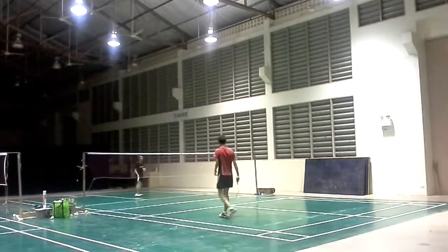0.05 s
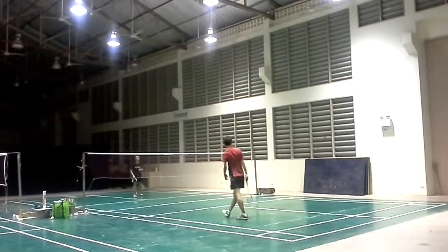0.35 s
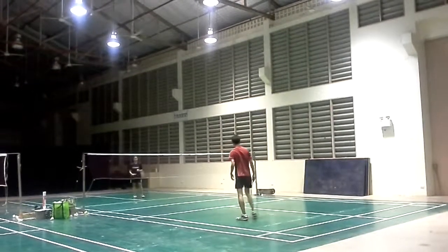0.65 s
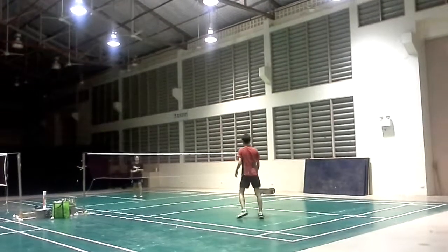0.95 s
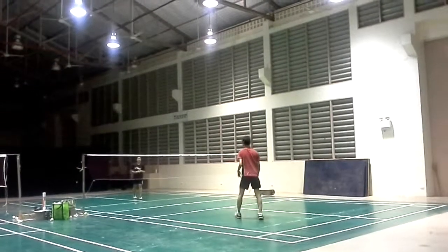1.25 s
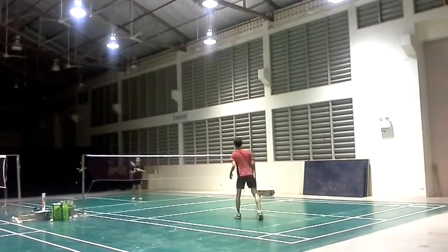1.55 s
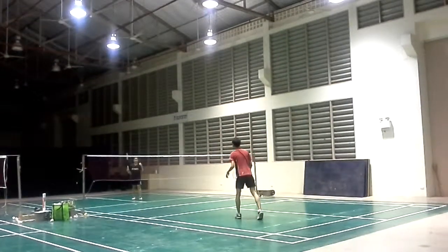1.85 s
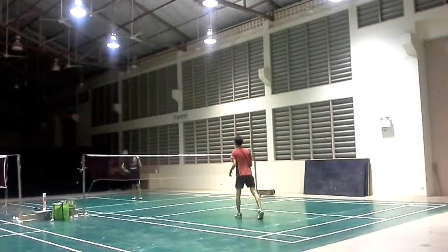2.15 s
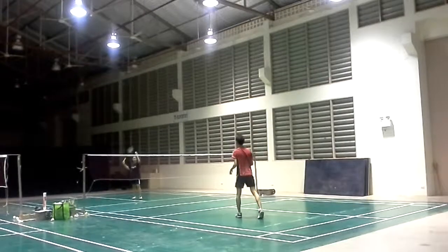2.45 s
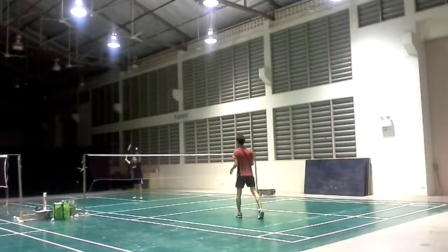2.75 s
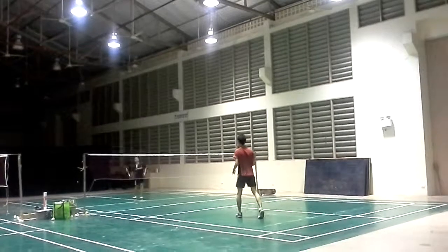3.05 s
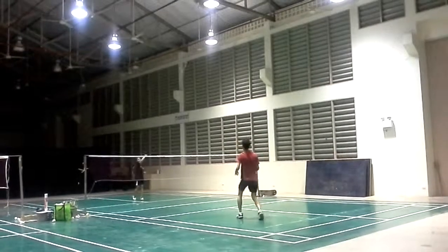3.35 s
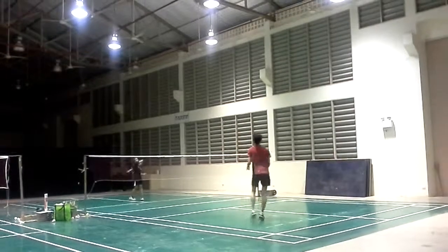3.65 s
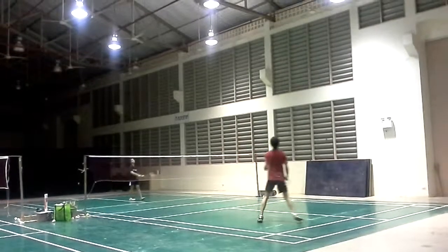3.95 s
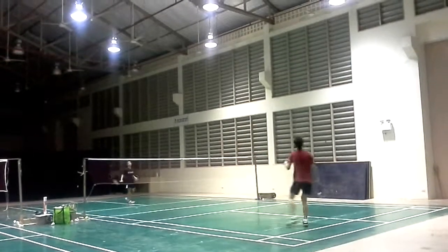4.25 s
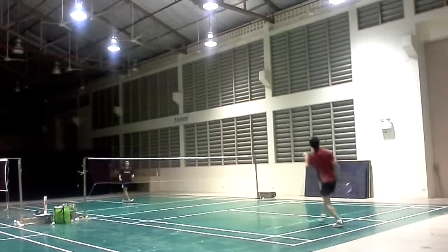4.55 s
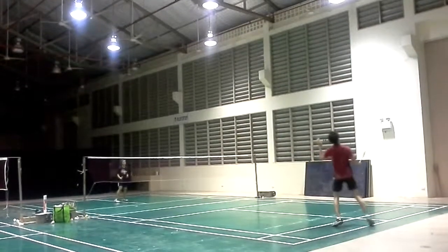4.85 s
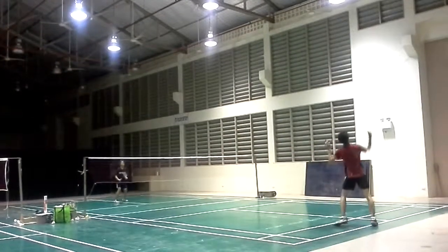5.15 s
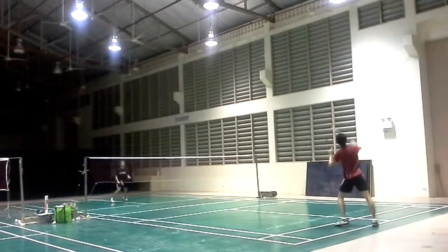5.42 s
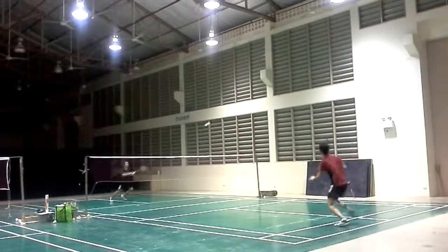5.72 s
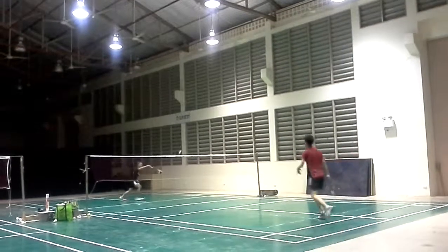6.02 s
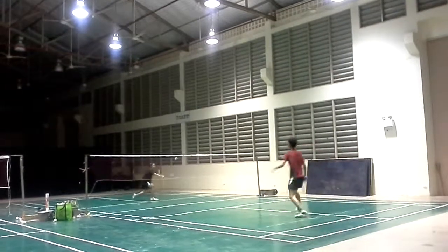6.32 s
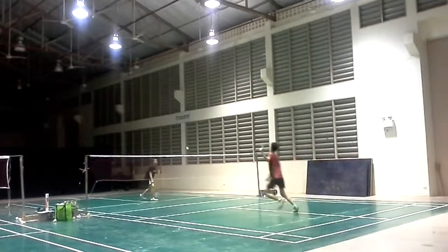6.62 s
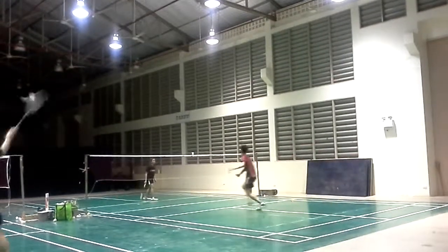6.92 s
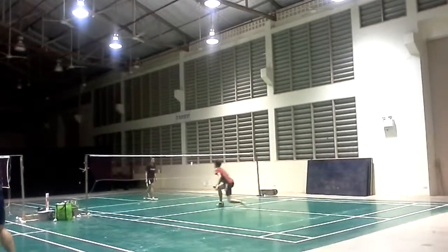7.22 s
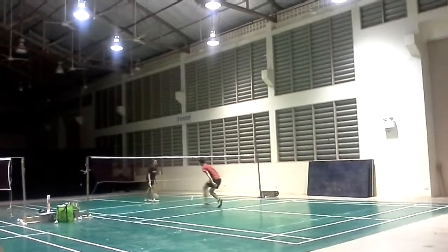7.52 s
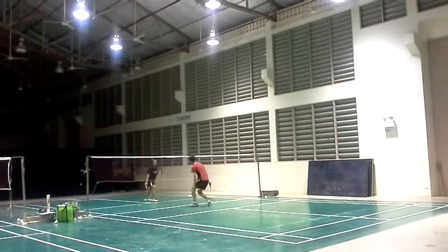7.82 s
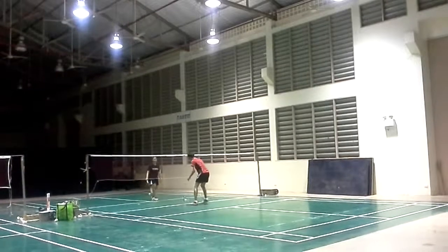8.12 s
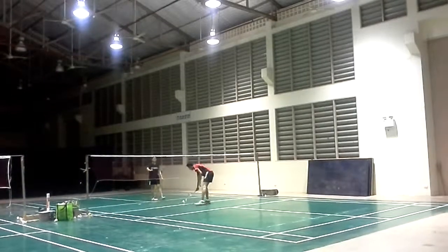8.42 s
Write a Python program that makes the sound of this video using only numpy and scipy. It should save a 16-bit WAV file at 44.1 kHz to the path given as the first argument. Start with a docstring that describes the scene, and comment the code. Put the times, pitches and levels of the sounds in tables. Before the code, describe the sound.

Badminton rackets strike a shuttlecock while shoes thud and squeak on the court, echoing in a large hall over steady hiss.

```python
"""Badminton rally in a sports hall.

Rackets knock, crack and ring, feet thud on the floor and rubber soles squeal as they stick and slip.
Heard from the side of the court, each sound arrives directly, off a near surface and as the long
reverberation of a large, hard-walled room, over the hall's steady hiss."""
import sys
import numpy as np
from scipy import signal
from scipy.fft import rfft, irfft, next_fast_len
from scipy.io import wavfile
from scipy.ndimage import uniform_filter1d, minimum_filter1d

SR = 44100
rng = np.random.default_rng(int(sys.argv[2]) if len(sys.argv) > 2 else 0)


def to_wav(s):
    """Save 16-bit WAV."""
    ch = np.atleast_2d(s).T  # columns
    pcm = np.round(np.clip(ch, -1, 1) * 32767)  # PCM
    wavfile.write(sys.argv[1], SR, pcm.astype(np.int16))


N = 382788


def undb(db):
    """Decibels to gain."""
    return 10 ** (np.asarray(db) / 20)


def clock(length_s):
    """Sample times of a short sound."""
    return np.arange(max(int(length_s * SR), 8)) / SR


def unit(x):
    """Scale to the energy of 0.1 s at rms 1."""
    return x / np.sqrt(np.sum(x ** 2) * 10 / SR + 1e-18)


def colour(x, points):
    """Minimum-phase filter through (frequency [Hz], gain [dB]) points."""
    size = next_fast_len(len(x) + 2048) // 2 * 2
    hz, db = np.transpose(points)
    bin_hz = np.maximum(np.fft.rfftfreq(size, 1 / SR), 1)
    gain = undb(np.interp(np.log(bin_hz), np.log(hz), db))
    cepstrum = irfft(np.log(gain))
    cepstrum[1:size // 2] *= 2
    cepstrum[size // 2 + 1:] = 0
    return irfft(rfft(x, size) * np.exp(rfft(cepstrum)))[:len(x)]


def resonate(x, hz, width_hz):
    """Two-pole resonance, gain 1 at its centre."""
    return signal.lfilter(*signal.iirpeak(hz, hz / width_hz, fs=SR), x)


def wander(count, rate_hz):
    """Smooth random motion, spread near 1."""
    points = rng.standard_normal(1024)
    return 1.2 * np.interp(np.arange(count) * rate_hz / SR, np.arange(len(points)), points)


def add(out, at_s, x):
    """Mix x into out from at_s."""
    i = int(at_s * SR)
    out[i:i + len(x)] += x[:len(out) - i]


# Air spectrum: (frequency [Hz], relative density [dB])
AIR_SPECTRUM = [(18, -66), (30, -9.5), (129, -5.5), (154, -2.5), (328, 3), (680, 1), (928, -1.5),
                (1340, -2), (1870, -9.5), (3150, -9), (3590, -12), (4900, 8), (5880, -11), (11300, -20),
                (15000, -26)]
# Hiss resonances: (centre [Hz], half-width of each filter stage [Hz], rms level [dB])
HISS_BANDS = [(2630, 320, -52), (4320, 75, -48), (4655, 110, -48), (4920, 82, -51.5)]


def air(rush_db=-41.5, waver_db=.6):
    """The hall's steady rush, with gently wavering bands of hiss."""
    rush = colour(rng.standard_normal(N), AIR_SPECTRUM)
    out = undb(rush_db + waver_db * wander(N, 34)) * rush / rush.std()
    for hz, half_width_hz, db in HISS_BANDS:
        band = rng.standard_normal(N)
        for _ in range(2):
            band = resonate(band, hz, 2 * half_width_hz)
        out += undb(db + waver_db * wander(N, 3.1)) * band / band.std()
    return out


# Reverberation bands: (frequency [Hz], t60 [s], relative level [dB])
REVERB_BANDS = [(110, 6.1, -10), (370, 1.38, 3), (736, 2, -6), (1110, 1.43, 7.5), (2510, 2.43, 7.5),
                (4260, 2.1, 2.5), (6900, 1.89, 7.5), (10500, 0.21, 0)]


def hall(early_db=6, early_s=.022, build_s=.013, gap_s=.00044, scatter=.25, wall_db=-11, wall_s=.12):
    """Reflections build up, peak early and die away by band. Returns place()."""
    t = clock(2)
    hz, t60_s, db = np.transpose(REVERB_BANDS)
    log_hz = np.log(np.maximum(np.fft.rfftfreq(N, 1 / SR), 1))
    noise = rng.standard_normal(N)
    strength = np.exp(scatter * np.repeat(rng.standard_normal(N // 64 + 1), 64)[:N])
    field = rfft(noise * strength)
    bands = np.array([irfft(field * np.interp(log_hz, np.log(hz), row), N) for row in np.eye(len(hz))])
    build = 1 - np.exp(-np.maximum(t - gap_s, 0) / build_s)
    early = 1 + undb(early_db) * np.exp(-t / early_s)
    fades = build * early * np.exp(-np.log(1000) * t / t60_s[:, None])
    fades *= undb(db)[:, None] / (np.linalg.norm(fades[3]) * bands.sum(axis=0).std())

    def place(x, direct_db, lag_s, echo_db):
        """Paths from one spot: diffuse tail, direct sound, near echo, seven off walls and roof."""
        i = int(rng.random() * (N - len(t)))
        paths = np.sum(bands[:, i:i + len(t)] * fades, axis=0)
        paths[0] += undb(direct_db)
        paths[int(lag_s * SR)] += undb(echo_db)
        lags_s = .013 + .11 * rng.random(7)
        paths[(lags_s * SR).astype(int)] += undb(wall_db) * np.exp(-lags_s / wall_s)
        return signal.fftconvolve(x, paths)
    return place


def knock(hz, decay_cycles):
    """Soft contact: a pressure swing of a cycle or two."""
    t = clock(.04)
    age = t * hz / decay_cycles
    swing = age ** 3 * np.exp(-age) * np.sin(2 * np.pi * hz * t)
    return unit(np.gradient(swing))


def burst(decay_s, spectrum):
    """Hard contact: decaying coloured noise."""
    t = clock(.08)
    return unit(colour(rng.standard_normal(len(t)) * np.exp(-t / decay_s), spectrum))


# Crack of a tap or racket hit: (frequency [Hz], gain [dB])
CRACK_SPECTRUM = [(100, -19.5), (400, 12), (1200, 0), (2100, -7.5), (3400, -3), (5400, -6.5), (6600, -13.5),
                  (9000, -13.5), (14000, -52)]
# Shoe scuffs, shuttle and racket-frame taps, and the hard echo of a hit: (time [s], level [dB], resonance [Hz],
# decay [s], direct gain [dB])
TAPS = [(.435, -49, 4970, 0.069, 10), (.455, -51, 1200, 0.023, 5), (0.551, -54, 4200, 0.016, 9.5),
        (.832, -55.5, 1360, 0.0026, 3), (0.919, -52, 6250, 0.0028, 3), (1.292, -51, 1500, 0.0053, 1.5),
        (2.594, -47.5, 1890, 0.0062, 2), (2.639, -50, 5500, .004, 5), (2.668, -53, 5300, 0.0055, 8),
        (5.386, -59.5, 2280, 0.0025, 24.5), (5.44, -63, 4600, .004, 1), (5.485, -45.5, 2960, 0.04, 9),
        (6.5663, -53.5, 6050, 0.00021, 21), (8.086, -46, 2853, 0.0058, 2)]


def taps(out, place):
    """Hard contacts with two broad resonances: clicks when brief, scuffs when drawn out."""
    for at_s, db, hz, decay_s, direct_db in TAPS:
        crack = burst(decay_s, CRACK_SPECTRUM)
        tap = resonate(crack, hz, width_hz=1100) + undb(-9) * resonate(crack, 2400, width_hz=700)
        add(out, at_s, place(undb(db) * unit(tap), direct_db, lag_s=.005, echo_db=direct_db - 16))


# Sole slap: (frequency [Hz], gain [dB])
SLAP_SPECTRUM = [(120, -19.5), (310, 8), (650, 8.5), (900, 14), (1350, 6), (2000, 0.5), (2700, -1.5),
                 (3400, -3.5), (4800, 9.5), (6500, -5.5), (9000, -17), (14000, -99)]


def footfall(thud_db, thud_hz, slap_db, weight_hz=160, weight_db=-16):
    """The sole slaps and thuds; the player's weight adds a low bump."""
    out = undb(slap_db) * burst(.0041, SLAP_SPECTRUM)
    bump = undb(weight_db) * knock(weight_hz, decay_cycles=.28)
    add(out, 0, undb(thud_db) * (knock(thud_hz, decay_cycles=.26) + bump))
    return out


# Landings: (time [s], thud level [dB], thud pitch [Hz], slap re thud [dB], direct gain [dB])
FOOTSTEPS = [ (.481, -46.5, 463, -18, -0.5), (.832, -49, 490, -8, -10), (.96, -48, 424, -2, -6),
             (1.06, -42.5, 422, -8, -7), (1.289, -48.5, 685, -19, -3.5), (2.631, -39, 440, -5, -8),
             (2.997, -41, 540, -9, -4), (3.151, -40.5, 434, -12, -21), (3.31, -32, 360, 2.5, 1.5),
             (3.329, -26.5, 454, 3.5, -4), (3.386, -48, 220, 9.5, 6.5), (3.555, -54, 330, -8, 4),
             (3.655, -44.5, 160, 0, -9), (3.676, -25.5, 648, 1, -3), (3.738, -47, 400, 4, -4),
             (3.893, -41, 520, 9.5, 0.5), (4.582, -41, 492, -4.5, -1.5), (4.596, -45.5, 115.4, -7, -2),
             (4.963, -49, 604, -2, 5), (5.038, -39.5, 430, -13, -3), (5.071, -43.5, 555, -1.5, -2),
             (5.47, -36, 448, -3, -13), (5.496, -47, 105, -13, -7), (5.64, -38, 480, -2, -8),
             (6.061, -41, 480, 3.5, -2), (6.60, -42, 397, -6.5, 7.5), (6.645, -39.5, 450, -5.5, 1.5),
             (7.055, -41, 560, -3, -1), (7.204, -34.5, 400, -5, -10), (7.238, -41.5, 240, -3.5, 1),
             (7.321, -34.5, 474, -1, -6), (7.485, -42, 420, -2, -11), (7.561, -53.5, 480, -6, 3),
             (7.747, -32, 392, -3, -9), (7.794, -35.5, 370, -7, -6), (8.224, -34, 450, -4.5, -9.5),
             (8.3, -45.5, 149, -5, -7), (8.536, -46, 607, 3, -6.5)]


def footsteps(out, place, forefoot_lag_s=.036):
    """Heel, then forefoot: softer, with much less slap."""
    for at_s, heel_db, hz, slap_db, direct_db in FOOTSTEPS:
        forefoot_db = heel_db - 15.5
        step = np.zeros_like(clock(.2))
        add(step, 0, footfall(heel_db, hz, heel_db + slap_db))
        add(step, forefoot_lag_s, footfall(forefoot_db, hz, forefoot_db + slap_db - 15))
        add(out, at_s, place(step, direct_db, lag_s=.005, echo_db=direct_db - 3))


# Rubber's low roll-off: (frequency / lowest pitch [ratio], gain [dB])
RUBBER_ROLLOFF = [(.74, -16), (.92, -1)]


def squeak(length_s, start_hz, end_hz, roughness, octave_db, flutter=.83, grab_s=.0015, release=.23):
    """Rubber sticks and slips thousands of times a second; the rate glides and trembles under braking."""
    t = clock(length_s)
    progress = t / t[-1]
    hz = (start_hz + (end_hz - start_hz) * progress) * (1 + roughness * wander(len(t), 795))
    phase = 2 * np.pi * np.cumsum(hz) / SR
    phase += undb(-15) * wander(len(t), 1500)  # uneven slips: a noise skirt round each harmonic
    tone = np.sin(phase) + undb(octave_db) * (np.sin(2 * phase) + undb(-20) * np.sin(3 * phase))
    ramp = np.clip(np.minimum(t / grab_s, (1 - progress) / release), 0, 1)
    grip = np.sin(np.pi / 2 * ramp) ** 2 * np.exp(flutter * wander(len(t), 306))
    low_cut = [(ratio * min(start_hz, end_hz), db) for ratio, db in RUBBER_ROLLOFF]
    return unit(colour(np.pad(tone * grip, (0, len(t))), low_cut))


# Sole squeaks: (time [s], length [s], start pitch [Hz], end pitch [Hz], level [dB],
# pitch roughness [ratio], octave re fundamental [dB], direct gain [dB], wall echo gain [dB])
SOLE_SQUEAKS = [ (0.325, 0.01, 3900, 3680, -45, 0.022, -16.5, 2, -5),
                (1.62, 0.031, 3940, 3680, -36.5, 0.036, -17, -5.5, -10),
                (1.628, 0.069, 3920, 3870, -35, 0.029, -14.5, -14, -13),
                (1.633, 0.043, 3700, 3155, -38.5, 0.056, -8, -2.5, -12),
                (1.672, 0.0455, 3203, 3030, -39, 0.024, -13.5, 0, -13),
                (3.48, 0.011, 4700, 4530, -25, 0.026, -28.5, 8, -11),
                (3.833, 0.018, 4682, 4450, -28.5, 0.034, -24, 1, -6),
                (3.866, 0.0066, 4566, 4620, -24.5, 0.021, -23, 0.5, -8),
                (3.926, 0.028, 4634, 4530, -26, 0.022, -29, 1, -17),
                (5.521, 0.075, 3846, 3620, -33, 0.037, -14, -5, -25),
                (5.578, 0.086, 5410, 5370, -38, 0.023, -22, -4, -15),
                (5.971, 0.018, 3716, 3410, -23.5, 0.021, -12.5, 7, 1),
                (6.0, 0.014, 3640, 3380, -27, 0.026, -16, 8.5, -5),
                (6.839, 0.0084, 4680, 4240, -40.5, 0.017, -24, 3, -11),
                (6.859, 0.06, 4475, 4436, -28.5, 0.037, -17.5, -5, -5),
                (6.862, 0.041, 3590, 3440, -39.5, 0.023, -5.5, -18, -24),
                (6.919, 0.016, 4530, 4420, -26, 0.029, -40, 3.5, -4),
                (7.72, 0.013, 6020, 4000, -35.5, 0.031, -20, -2.5, -3),
                (7.739, 0.015, 6000, 4260, -36, 0.029, -20, -2, 5),
                (7.762, 0.054, 5410, 5010, -32.5, 0.05, -32, 0, -6),
                (7.773, 0.021, 4674, 4390, -20.5, 0.085, -33, -3, -8),
                (7.784, 0.027, 4060, 3924, -29, 0.024, -16, 3, 0),
                (7.824, 0.033, 4200, 4003, -29.5, 0.036, -22, 7.5, 3),
                (8.5542, .009, 4390, 4100, -22.5, 0.0088, -29.5, 1, 0),
                (8.575, 0.029, 3725, 3560, -22.5, 0.017, -20, -2.5, -7),
                (8.587, 0.026, 4280, 4175, -17.5, 0.016, -32, -1, -16)]
WALL_LAG_S = .021


def skids(out, place):
    """Braking soles squeak, each with a wall echo."""
    for at_s, length_s, start_hz, end_hz, db, roughness, octave_db, direct_db, echo_db in SOLE_SQUEAKS:
        sole = undb(db) * squeak(length_s, start_hz, end_hz, roughness, octave_db)
        add(out, at_s, place(sole, direct_db, WALL_LAG_S, echo_db))


def sole_grip(length_s, start_hz, end_hz, roughness):
    """One grip of a sliding sole: the shriller the squeak, the weaker its octave."""
    octave_db = -16.5 - 25 * np.log2(end_hz / 3800)
    return squeak(length_s, start_hz, end_hz, roughness, octave_db)


# Push-off slide: (time [s], relative level [dB], pitch [Hz])
SLIDE_PATH = [(3.263, -9, 4176), (3.297, -19, 3980), (3.421, -10.5, 4440)]


def slide(catch_s=.0072, catch_db=-34, grip_s=.025, grip_every_s=.016, grip_db=-11.5):
    """A sole catches with a falling chirp, then grips repeatedly; level and pitch dip, then climb."""
    times_s, db, hz = np.transpose(SLIDE_PATH)
    times_s = times_s - times_s[0]
    out = np.zeros_like(clock(times_s[-1] + 2 * grip_s))
    add(out, 0, undb(catch_db) * sole_grip(catch_s, 1.07 * hz[0], .94 * hz[0], roughness=.017))
    for at_s in np.arange(catch_s, times_s[-1], grip_every_s):
        start_hz, end_hz = np.interp([at_s, at_s + grip_s], times_s, hz)
        gain = undb(grip_db + np.interp(at_s + grip_s / 2, times_s, db))
        add(out, at_s, gain * sole_grip(grip_s, start_hz, end_hz, roughness=.041))
    return out


def squeak_overtone(length_s=.073, level_db=-52):
    """Thin, high sizzle of a sole squeak's third harmonic: quick onset, then fading."""
    t = clock(length_s)
    progress = t / t[-1]
    sizzle = rng.standard_normal(len(t))
    for _ in range(2):
        sizzle = resonate(sizzle, hz=12200, width_hz=1000)
    return undb(level_db) * unit(sizzle * np.sqrt(progress) * (1 - progress) ** 2)


# String bed modes: (frequency / string pitch [ratio], relative level [dB], t60 at sustain 1 [s])
STRING_BED_MODES = [(1, -5, 0.19), (.925, -15.5, 0.21), (1.55, -13.5, 0.085)]


def racket(thock_db, thock_hz, crack_db, string_hz, ring_db, sustain):
    """The cork knocks and cracks on the string bed, which rings briefly."""
    t = clock(.3)
    strings = np.zeros_like(t)
    for ratio, db, t60_s in STRING_BED_MODES:
        fade = np.exp(-np.log(1000) * t / (t60_s * sustain))
        strings += undb(db) * np.sin(2 * np.pi * ratio * string_hz * t) * fade
    out = undb(ring_db) * unit(strings)
    add(out, 0, undb(thock_db) * knock(thock_hz, decay_cycles=.15))
    add(out, 0, undb(crack_db) * burst(.0038, CRACK_SPECTRUM))
    return out


# Snap of the wall echo: (frequency [Hz], gain [dB])
SNAP_SPECTRUM = [(300, -27), (1200, -3.5), (1800, -17.5), (2300, 3), (3000, -9), (3700, -8.5), (4600, 0.5),
                 (5700, 2.5), (6600, -16.5), (14000, -33.5)]
# Racket hits; at 3.65 s and 5.77 s a player's lunging stamp gives the loud thock: (time [s], thock [dB], thock
# pitch [Hz], crack [dB], string pitch [Hz], ring [dB], sustain [ratio], direct gain [dB], wall lag [s], wall
# echo gain [dB], snap [dB], snap decay [s])
RACKET_HITS = [ (1.806, -62, 420, -79, 1112, -54.5, 1.3, 7, 0.037, -10, -69, .001),
               (2.563, -35.5, 355, -46, 2480, -55, .8, 0.5, 0.015, -22, -43.5, 0.0059),
               (3.6507, -21, 490, -28, 1137, -29.5, .7, 4.5, 0.024, -12, -37.5, 0.0033),
               (4.662, -44.5, 690, -35.5, 920.5, -37.5, 1, -1, 0.022, -12, -51, 0.003),
               (5.385, -49, 960, -34.5, 1130, -49, 1, -6, 0.024, -14, -33, 0.0017),
               (5.7693, -24.5, 509, -30, 1117, -36.5, .75, 3.5, 0.026, -11, -42, 0.0011),
               (6.566, -27.5, 420, -32, 1160, -59, 1, -6, 0.021, -15, -39.5, 0.004),
               (7.012, -51.5, 655, -41, 900, -38.5, 1.2, 2, .0222, -6, -49, 0.0023)]


def rally(out, place, floor_lag_s=.0054):
    """Each hit reflects off the floor, then off a wall with a bright snap."""
    for at_s, *blow, direct_db, wall_lag_s, wall_db, snap_db, snap_decay_s in RACKET_HITS:
        hit = racket(*blow)
        snap = undb(snap_db) * burst(snap_decay_s, SNAP_SPECTRUM)
        add(out, at_s, place(hit, direct_db, floor_lag_s, echo_db=direct_db - 9))
        add(out, at_s + wall_lag_s, undb(wall_db) * hit)
        add(out, at_s + wall_lag_s, place(snap, direct_db=8, lag_s=floor_lag_s, echo_db=-8))


def scene():
    """Rackets, feet and squeaks over the air, each from its own spot in the hall."""
    out, place = air(), hall()
    rally(out, place)
    taps(out, place)
    footsteps(out, place)
    skids(out, place)
    add(out, SLIDE_PATH[0][0], place(slide(), direct_db=-2.5, lag_s=WALL_LAG_S, echo_db=-6.5))
    add(out, 7.725, place(squeak_overtone(), direct_db=0, lag_s=WALL_LAG_S, echo_db=-4))
    return out[None]


def record(dry, bass_hz=70, top_hz=14600, ceiling=.95, limiter_s=.002):
    """Bass cut, fast peak limiter, steep treble cut."""
    thin = signal.sosfilt(signal.butter(2, bass_hz, "high", fs=SR, output="sos"), dry)
    window = int(limiter_s * SR)
    peak_gain = ceiling / np.maximum(np.abs(thin), ceiling)
    gain = uniform_filter1d(minimum_filter1d(peak_gain, window), window)
    return signal.sosfilt(signal.ellip(10, .2, 80, top_hz, fs=SR, output="sos"), thin * gain)


dry = scene()
out = record(dry)
to_wav(out)
```